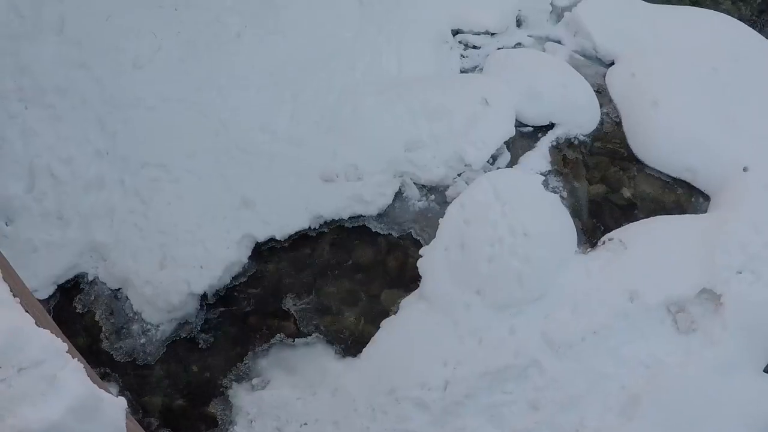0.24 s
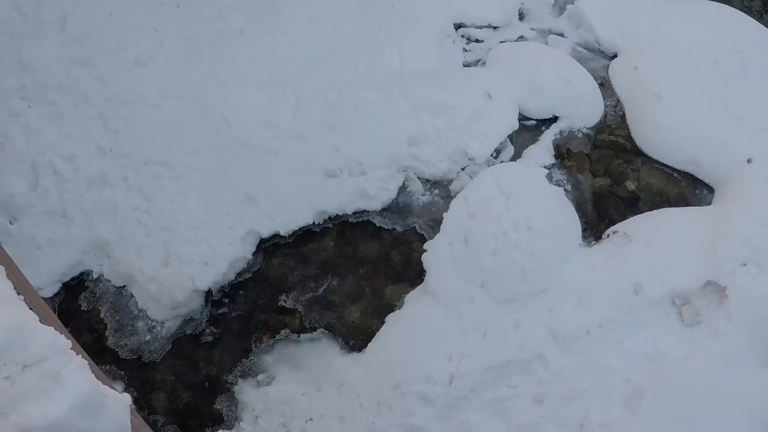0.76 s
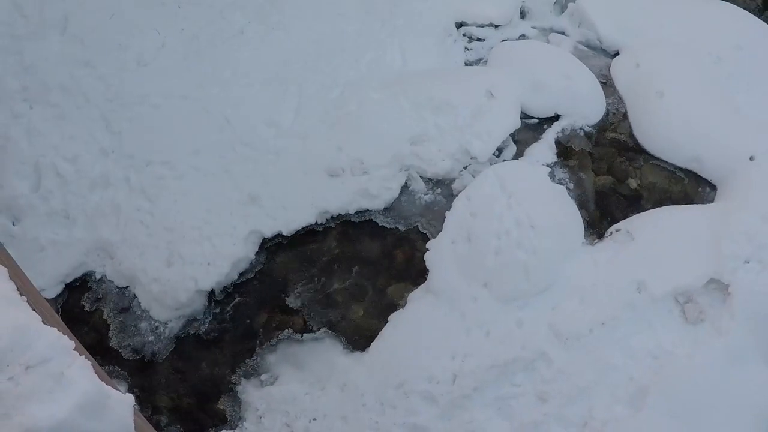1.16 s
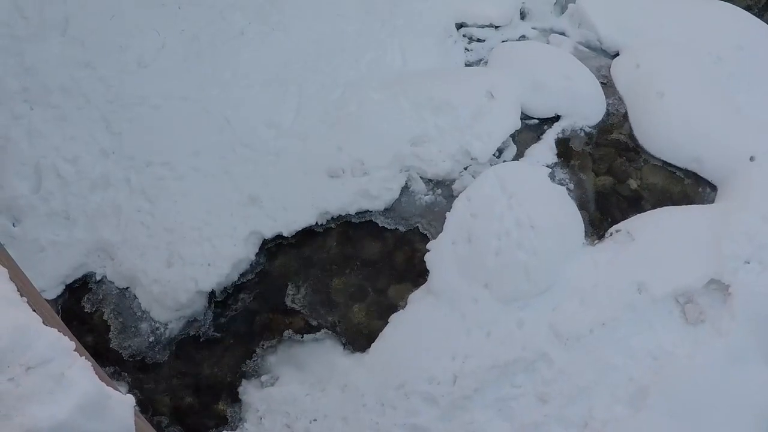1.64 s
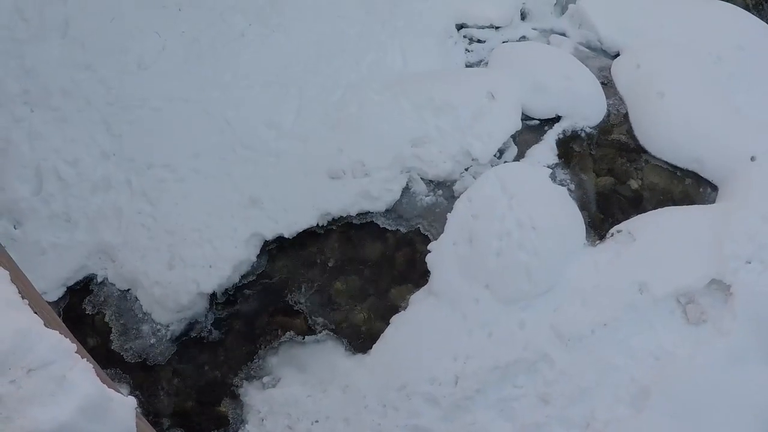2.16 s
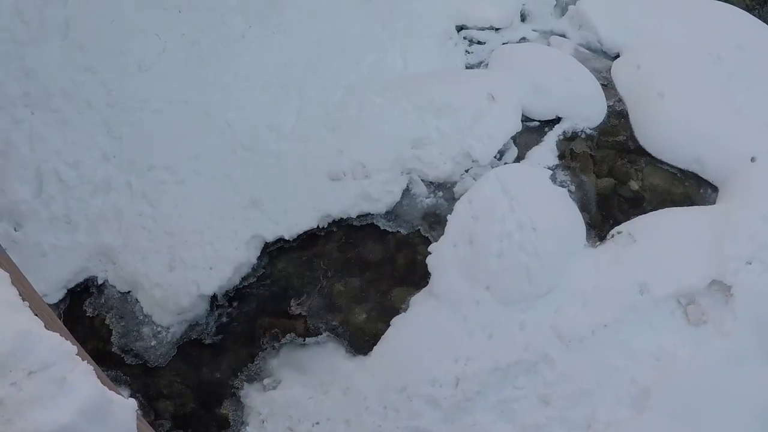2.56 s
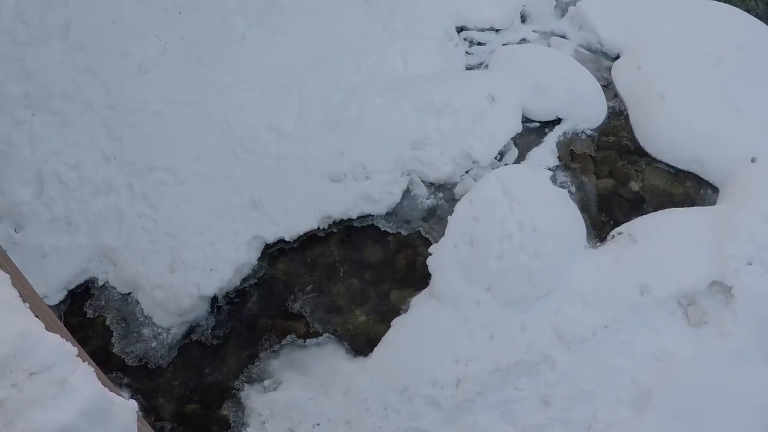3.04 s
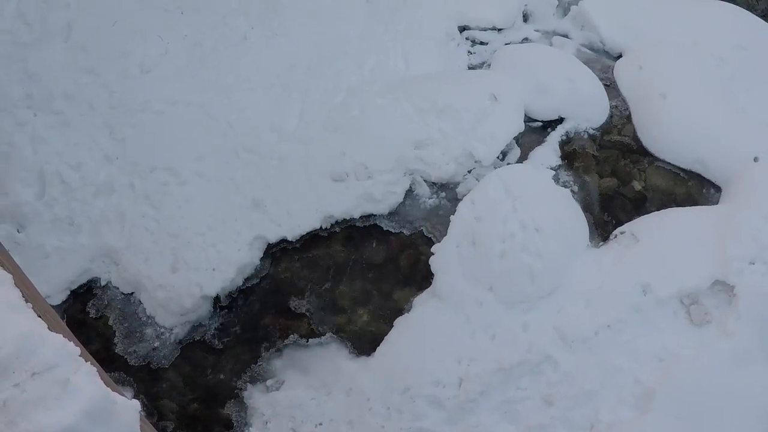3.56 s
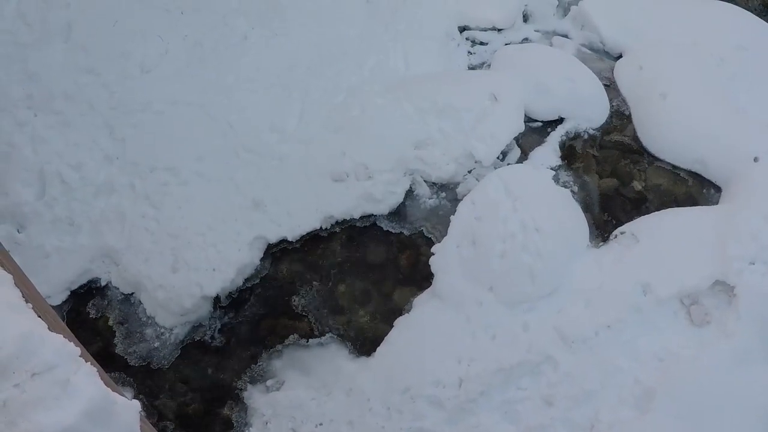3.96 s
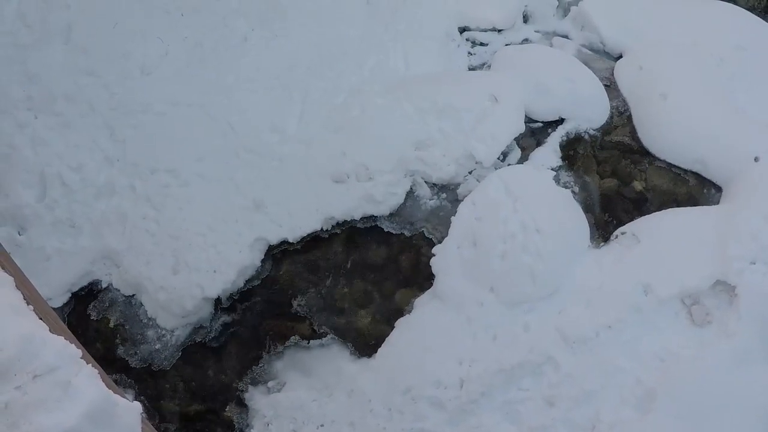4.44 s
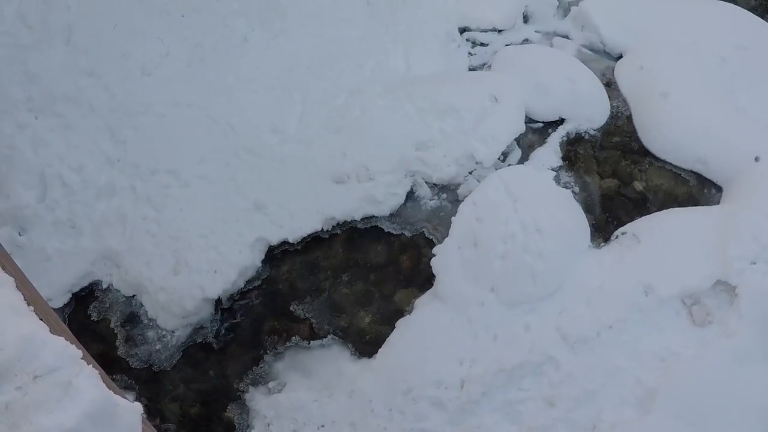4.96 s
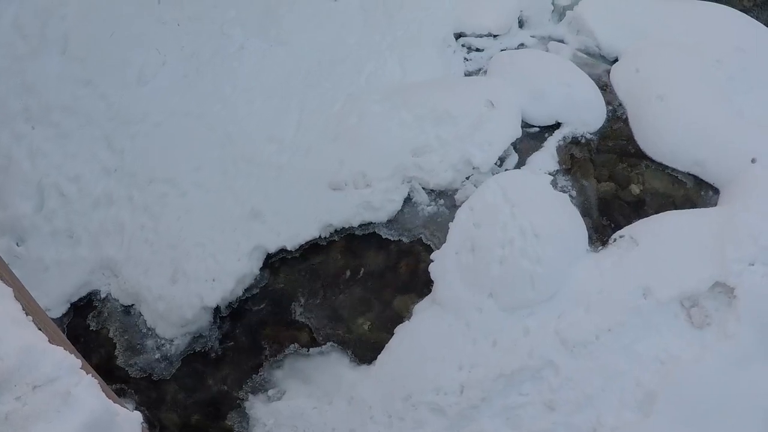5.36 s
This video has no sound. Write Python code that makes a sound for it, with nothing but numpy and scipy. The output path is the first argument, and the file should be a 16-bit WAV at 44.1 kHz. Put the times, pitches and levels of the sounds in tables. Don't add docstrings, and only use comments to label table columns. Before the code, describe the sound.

A small stream flows between snow-covered rocks and ice, heard outdoors from fairly close. From the start a low hollow gurgle around the low-mid range and a softer, broad surface wash run continuously, slightly brighter for the first quarter second. Below them a distant propeller aircraft hums very low, its level beating slowly, strongest near 1.9 seconds, its pitch sinking slightly and its upper tones fading. Faint wind rumble adds soft pushes near 0.3, 2.5 and 3.2 seconds. Low slaps fall near 0.25 and 0.8, with glugs around 0.5, and clear high drops at about 1.0 and 1.2. More glugs come near 1.7 and 2.4. From 3.5 to 4.6 seconds bubbling is densest, with rounded plops at 3.6, 3.9 and 4.1 and a sharp spit of spray at 4.2. Drops and slaps return at 5.1 to 5.4, and the flow continues to the end at about 5.6.

```python
import sys
import numpy as np
from scipy import signal
from scipy.fft import rfft, irfft, next_fast_len
from scipy.io import wavfile
from scipy.ndimage import uniform_filter1d, map_coordinates

SR = 44100
rng = np.random.default_rng(int(sys.argv[2]) if len(sys.argv) > 2 else 0)


def ratio(d):
    e = np.asarray(d, float) / 20
    return 10 ** e


def bounce(signal):
    frames = np.transpose(np.atleast_2d(signal))
    limited = np.clip(frames, -1, 1)
    pcm = np.round(limited * 32767).astype(np.int16)
    wavfile.write(sys.argv[1], SR, pcm)


N = 247401

# (frequency [Hz], level per Hz [dB])
AIR_SPECTRUM = [(11, -33), (18, -4.5), (70, 5), (119, 0), (156, -1.5), (220, -24), (290, -41), (480, -120)]
# (time [s], peak level [dB])
GUST_PUSHES = [
    (0.29, -38),
    (2.53, -39),
    (3.15, -40),
]
AIR_DB, AIR_FADE_DB_PER_S, GUST_DB, GUSTS_PER_S = -47.5, 0.44, 1.3, 6.06
PUSH_HZ = 40

# (multiple of blade tone [1], level against the third [dB])
UPPER_HARMONICS = [
    (4, -6),
    (5, -6.5),
    (6, -12),
]
# (time [s], blade tone gain [dB], second harmonic gain [dB])
PATH_BEATS = [(0.06, 0.5, -1.5), (0.35, -4.5, 1.1), (0.58, -0.5, -1.5), (0.7, -3, -0.5), (1.25, 1, 0.5),
              (1.52, -7, 1), (1.68, 0.7, -0.3), (1.9, 6.5, 1), (2.38, -5.5, 0.2), (2.55, 0.2, -3),
              (2.75, 2, 0.5), (3.27, -5, 1), (3.55, -1.7, 1.5), (4, 1.3, 1.5), (4.4, -4.5, -0.5),
              (4.9, -1.5, -2.5), (5.3, 1, 4), (5.6, -0.5, 4)]
BLADE_HZ, SINK_HZ_PER_S = 82.58, 0.37
FADE_DB_PER_S, DULL_DB_PER_S = 1.26, 1.6
SECOND_DB, THIRD_DB = -39, -46

# (time [s], level [dB])
HOLLOW_LEVEL = [
    (0.06, -40),
    (0.1, -40),
    (0.24, -42),
    (0.63, -41),
    (2.4, -41),
    (3.61, -40),
    (4.29, -43.5),
    (5.0, -40),
    (5.6, -41),
]
# (frequency [Hz], level per Hz [dB])
HOLLOW_SPECTRUM = [(90, -120), (120, -2.5), (200, -1), (300, -0.5), (400, 0), (500, -0.5), (620, -7.5),
                   (800, -12), (1000, -35), (1500, -120)]
# (time [s], level [dB])
WASH_LEVEL = [(0.06, -53.7), (0.42, -52.5), (0.9, -54.2), (1.12, -52.4), (1.26, -53.7), (1.5, -51.8),
              (2.1, -54), (2.42, -52), (2.65, -54.2), (3.15, -54.2), (3.42, -52.5), (3.54, -54),
              (4.14, -53), (4.4, -54.2), (4.8, -52.8), (5.05, -53), (5.42, -53), (5.6, -52)]
# (frequency [Hz], level per Hz [dB])
WASH_SPECTRUM = [(400, -120), (470, 1), (800, 0.0), (1340, -4.0), (1680, -9.0), (2990, -7.5), (3420, -10.5),
                 (4770, -13), (5890, -19), (7720, -23.5), (9170, -25.5), (13600, -28.0), (15200, -29)]
BRIGHT_DB, SETTLE_S, TREBLE_GROWS = 3, 0.25, 0.3

# (time [s], peak level [dB], centre frequency [Hz], lower hiss against the peak [dB])
SPITS = [(0.0758, -54, 7030, -1), (0.2804, -57, 8000, 5), (0.3821, -50, 10500, -6),
         (0.9409, -51, 10200, -8), (1.078, -56, 8020, 0), (1.1339, -58, 7180, 8), (1.2123, -49, 9500, -6),
         (1.2457, -56, 7870, -3), (1.4249, -62, 7630, -2), (1.4462, -57, 7160, 0), (1.6223, -49, 7590, 2),
         (1.6877, -60, 7600, 3), (1.7655, -57, 7200, 2), (2.2495, -52, 10300, 2), (2.3217, -56, 7000, -1),
         (2.3775, -50, 7900, 1), (2.4913, -56, 7340, 6), (2.9353, -54, 7100, 4), (3.225, -62, 7170, 11),
         (3.2339, -56, 7200, 4), (3.3769, -50, 7197, -5), (3.4337, -57, 7650, 8.5), (3.501, -55, 7310, -2),
         (3.6457, -54.5, 7200, 8), (3.6901, -55, 8020, 0), (4.0433, -57, 7810, 4), (4.1808, -55, 7600, 9),
         (4.235, -47.5, 7700, -4), (4.5062, -59, 7100, 3), (4.823, -58, 7710, 9)]
# (frequency [Hz], level per Hz [dB])
FINE_HISS = [(5000, -120), (6500, 9), (10000, -2), (15000, -13), (16000, -120)]
COARSE_HISS = [(1800, -120), (2500, -1), (5000, -3), (7000, -120)]

# (time [s], peak level [dB], pitch [Hz])
GLUGS = [(0.508, -33, 244), (0.543, -28, 350), (0.639, -35, 254), (1.678, -29, 472), (1.786, -33, 255),
         (1.868, -34, 428.6), (2.322, -30, 427), (2.411, -30, 363), (2.443, -35, 244), (2.871, -30, 540),
         (2.986, -33, 400), (3.055, -36, 308), (3.534, -27, 334.3), (3.607, -24, 256), (3.858, -30.5, 469),
         (3.892, -30, 414.5), (3.935, -23, 480), (4.064, -22, 440), (4.122, -31.5, 313), (4.192, -31, 447),
         (4.295, -38, 301), (4.345, -25, 385), (4.462, -28, 397), (4.548, -27, 337), (5.122, -39, 285),
         (5.174, -28, 313), (5.302, -31, 306), (5.337, -34, 200), (5.576, -35, 360)]
# (time [s], peak level [dB], pitch [Hz])
THUDS = [(0.254, -24, 330), (0.769, -22.5, 474), (1.624, -29, 458), (2.029, -31, 256), (3.606, -26, 262),
         (3.934, -27, 456), (4.502, -30, 254.5), (4.639, -30, 297), (4.821, -30, 190), (5.149, -27, 248.7),
         (5.337, -22, 270)]
# (time [s], peak level [dB], pitch [Hz])
BLIPS = [(0.454, -38, 1200), (1.2482, -55, 1320), (1.6203, -38, 1360), (1.7899, -35, 1340),
         (2.297, -34, 1170), (2.7422, -37, 1320), (2.8251, -50, 991), (3.316, -36.5, 1084),
         (3.392, -36, 1213), (3.5, -35.5, 1163), (3.6013, -39, 1279), (3.623, -34.5, 1010),
         (3.9316, -36, 1129), (4.048, -37, 1315), (4.112, -35, 1240), (4.114, -37, 1580),
         (3.931, -39, 1800), (2.315, -40, 1700), (2.749, -38, 1400), (4.315, -37.5, 1272),
         (4.8076, -37, 1217), (4.908, -46, 1140), (5.0445, -38, 1290), (5.3696, -43, 1004),
         (5.504, -35, 1229), (5.5334, -42, 946)]
# (time [s], peak level [dB], pitch [Hz])
PLINKS = [(0.2794, -45, 3000), (0.4275, -43, 2800), (0.7982, -42, 2930), (0.988, -33, 2900),
          (1.013, -36.5, 3300), (1.1234, -43, 2470), (1.179, -36, 2900), (1.3616, -40.5, 2700),
          (1.619, -43, 3020), (1.8933, -45, 2683), (2.3133, -47, 2210), (2.375, -41.5, 2612),
          (2.614, -41.5, 2720), (2.9333, -43, 2960), (3.2322, -45, 2960), (3.4868, -41, 2250),
          (3.6375, -43, 3027), (3.7031, -42.5, 2860), (3.9307, -39, 2666), (4.188, -43, 2700),
          (4.194, -41.5, 2870), (4.4587, -45, 3013), (4.5252, -41, 2880), (4.763, -40, 2410),
          (4.823, -41, 2370), (4.9244, -42.5, 2560), (5.1125, -45, 2800), (5.1655, -35.5, 2920),
          (5.3712, -37, 2900), (5.5329, -40.5, 2440),
          (1.1473, -40.5, 4630), (1.77, -42, 3610), (2.394, -42, 3800), (2.4816, -38.5, 4740),
            (2.621, -41, 4000), (2.8, -42, 4200), (2.952, -43, 3600), (2.7417, -42, 3680),
            (3.2929, -41, 4120), (4.557, -39.5, 4120), (5.1525, -41, 3300)]
# (frequency [Hz], level per Hz [dB])
SPLASH_SPECTRUM = [(1200, -120), (1800, -3), (3000, 0), (5000, -4), (7000, -20), (12000, -120)]

# (frequency [Hz], width [Hz], boost [dB])
HOUSING = [(2970, 500, 2.5), (4170, 250, 3), (4480, 200, -3), (4730, 220, 4.5), (5450, 350, 2),
           (7600, 700, 2.5), (10400, 500, 1.5)]
START_S, TOP_HZ = 0.0504, 15380


def unit(x):
    return x / np.sqrt(np.mean(x ** 2) + 1e-20)


def curves(rows):
    s, *columns = np.transpose(rows)
    return [np.interp(np.arange(N) / SR, s, column) for column in columns]


def wobble(rate):
    knots = rng.standard_normal(int(N * rate / SR) + 4)
    return map_coordinates(knots, [np.arange(N) * rate / SR])


def filtered(x, response):
    m = next_fast_len(N + 8192)
    return irfft(rfft(x, m) * response(np.fft.rfftfreq(m, 1 / SR)), m)[..., :N]


def coloured(x, spectrum):
    f, db = np.transpose(spectrum)
    return unit(filtered(x, lambda hz: ratio(np.interp(np.log(hz + 1), np.log(f + 1), db))))


def patchy(patchy_db, bins, frames):
    z = signal.stft(rng.standard_normal(N), nperseg=256)[2]
    field = uniform_filter1d(rng.standard_normal(z.shape), bins, 0)
    field = uniform_filter1d(field, frames, 1)
    return unit(signal.istft(z * ratio(patchy_db * unit(field)), nperseg=256)[1][:N])


def bubbles(s, db, hz, cycles, rise, size):
    t = np.arange(size) / SR
    u = t * hz[:, None] / cycles
    tone = np.sin(2 * np.pi * cycles * u * (1 + rise * u / 2))
    fade_out = np.exp(-(t / t[-1]) ** 6 * 7)
    ring = tone * u * np.exp(1 - u) * fade_out
    at = np.round(s * SR).astype(int)[:, None] + np.arange(size)
    return np.bincount(at.ravel(), (ratio(db)[:, None] * ring).ravel(), N + size)[:N]


def swarm(count, centre_hz, spread, scatter_db, cycles, size):
    when, large = rng.random((count, 2)).T
    hz = np.clip(centre_hz * np.exp(spread * rng.standard_normal(count)), 100, 15000)
    equal_energy_db = 10 * np.log10(hz / centre_hz)
    db = -scatter_db * np.log(large + 0.0098) + equal_energy_db
    return unit(bubbles(when * N / SR, db, hz, cycles, rise=0.066, size=size))


def puffs(s, db, spectrum, swell_s):
    u = np.arange(1600) / SR / swell_s
    hits = np.bincount(np.round(s * SR).astype(int), ratio(db), N)
    envelope = signal.fftconvolve(hits, u * np.exp(1 - u))[:N]
    return envelope * coloured(rng.standard_normal(N), spectrum)


def rumble():
    level_db = AIR_DB - AIR_FADE_DB_PER_S * np.arange(N) / SR + GUST_DB * wobble(GUSTS_PER_S)
    s, db = np.transpose(GUST_PUSHES)
    pushes = bubbles(s - 0.02, db, np.full(len(s), PUSH_HZ), cycles=0.74, rise=0, size=8000)
    return ratio(level_db + 3.5) * coloured(rng.standard_normal(N), AIR_SPECTRUM) + pushes


def aircraft():
    t = np.arange(N) / SR
    first_db, second_db = curves(PATH_BEATS) + (SECOND_DB - FADE_DB_PER_S * t)
    phase = 2 * np.pi * np.cumsum(BLADE_HZ - SINK_HZ_PER_S * t) / SR + 0.15 * wobble(6)
    third_db = THIRD_DB - (FADE_DB_PER_S + DULL_DB_PER_S) * t + 1.93 * wobble(3.5)
    harmonics = [(1, first_db), (2, second_db), (3, third_db)]
    harmonics += [(k, third_db + db) for k, db in UPPER_HARMONICS]
    drone = np.zeros(N)
    for k, db in harmonics:
        level = np.sqrt(2) * ratio(db + 1.08 * wobble(12))
        drone += level * np.cos(k * phase + 0.88 + 0.27 * wobble(4.3))
    return drone


def wash():
    level_db, = curves(WASH_LEVEL)
    nearness_db = BRIGHT_DB * np.exp(-np.arange(N) / SR / SETTLE_S)
    treble_db = nearness_db + TREBLE_GROWS * (level_db - level_db.mean())
    fizz = ratio(-7) * swarm(count=12000, centre_hz=4000, spread=0.8, scatter_db=3, cycles=2.2, size=400)
    splashes = ratio(0.3 * wobble(9) + 0.8 * wobble(35))
    surface = coloured(splashes * (patchy(1.1, bins=8, frames=8) + fizz), WASH_SPECTRUM)
    treble = filtered(surface, lambda hz: 1 / (1 + (6000 / (hz + 1)) ** 4))
    return ratio(level_db + 3.5) * (surface + (ratio(treble_db) - 1) * treble)


def gurgle():
    level_db, = curves(HOLLOW_LEVEL)
    large = swarm(count=600, centre_hz=400, spread=0.495, scatter_db=-0.5, cycles=2.15, size=2600)
    flow = patchy(1.13, bins=2, frames=20) + ratio(-15.0) * large
    return ratio(level_db - 0.6) * coloured(flow, HOLLOW_SPECTRUM)


def spray():
    s, db, hz, lower_db = np.transpose(SPITS)
    bright = puffs(s, db - 6.5, FINE_HISS, swell_s=0.0018)
    lower = puffs(s, db + lower_db - 1, COARSE_HISS, swell_s=0.0034)
    first = bubbles(s, db - 4, hz, cycles=9.3, rise=0.01, size=600)
    second = bubbles(s + 0.0011, db - 13, 1.3 * hz, cycles=8, rise=0.011, size=600)
    return bright + lower + first + second


def large_bubbles():
    s, db, hz = np.transpose(GLUGS)
    glugs = bubbles(s, db - 7, hz, cycles=1.28, rise=0.036, size=3000)
    s, db, hz = np.transpose(THUDS)
    thuds = bubbles(s, db - 4, hz, cycles=0.59, rise=0.041, size=3000)
    s, db, hz = np.transpose(BLIPS)
    blips = bubbles(s, db - 4, hz, cycles=1.1, rise=0.014, size=1200)
    return glugs + thuds + blips


def drops():
    s, db, hz = np.transpose(PLINKS)
    plinks = bubbles(s, db - 3.5, hz, cycles=3.6, rise=0.013, size=800)
    late, apart = rng.random((len(s), 2)).T
    lower_hz = hz * (0.777 + 0.11 * apart)
    lower = bubbles(s + 0.00315 * late, db - 5.5, lower_hz, cycles=2.3, rise=0.037, size=800)
    return plinks + lower + puffs(s, db - 17, SPLASH_SPECTRUM, swell_s=0.003)


def stream():
    return wash() + gurgle() + spray() + large_bubbles() + drops()


def scene():
    return (rumble() + aircraft() + stream())[None]


def roll_off(x):
    return signal.sosfilt(signal.butter(12, 15400, fs=SR, output="sos"), x)


def record(dry):
    def housing(hz):
        return ratio(sum(db / (1 + (2 * (hz - centre) / width) ** 2) for centre, width, db in HOUSING))

    opened = np.clip((np.arange(N) / SR - START_S) / 0.0016, 0, 1)
    mix = filtered(filtered(dry, housing) * opened, lambda hz: hz < TOP_HZ)
    return roll_off(mix)


dry = scene()
out = record(dry)
bounce(out)
```